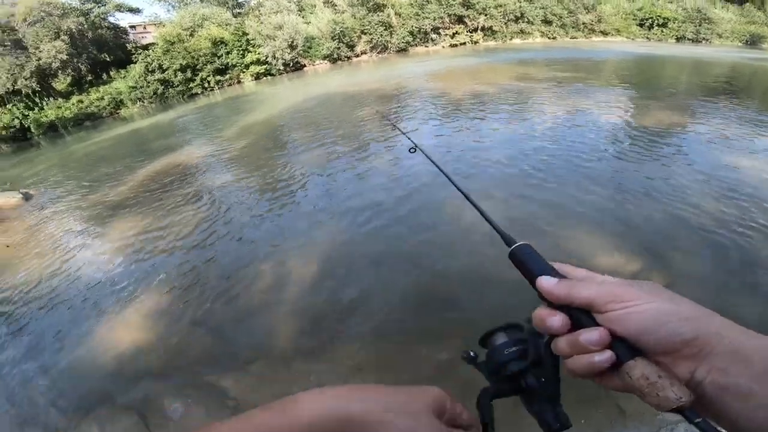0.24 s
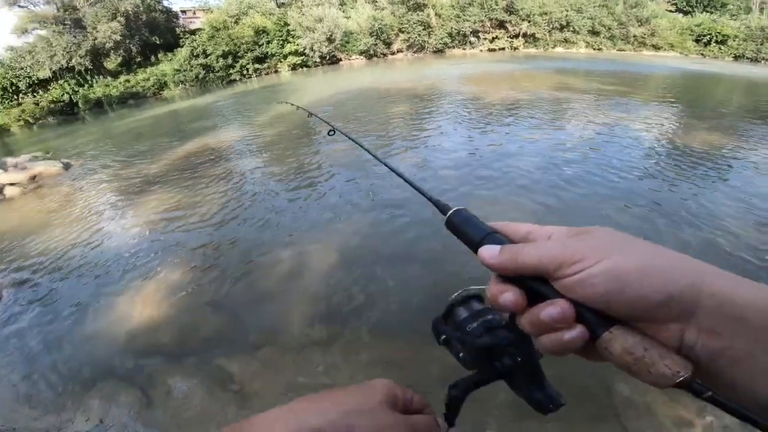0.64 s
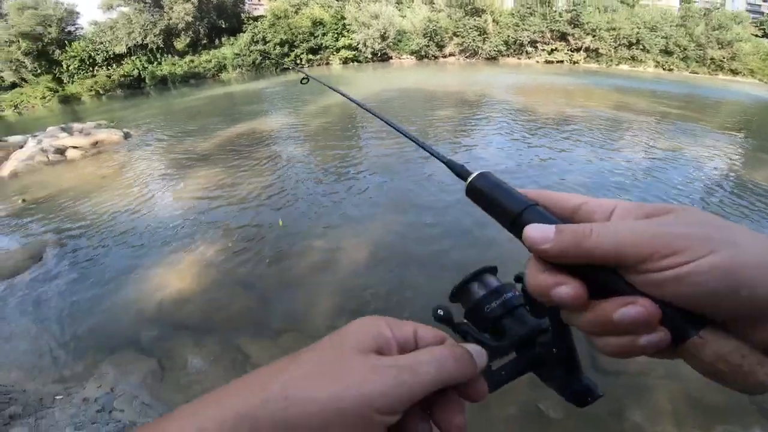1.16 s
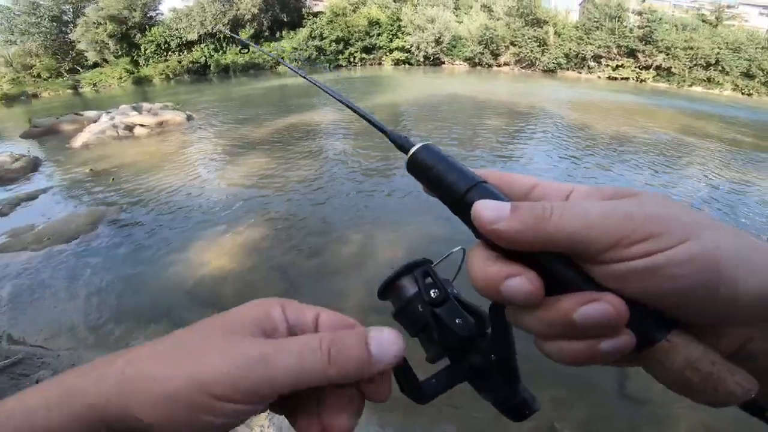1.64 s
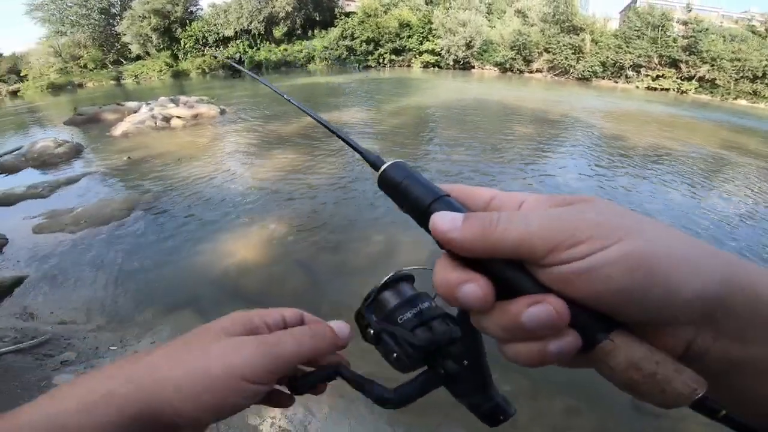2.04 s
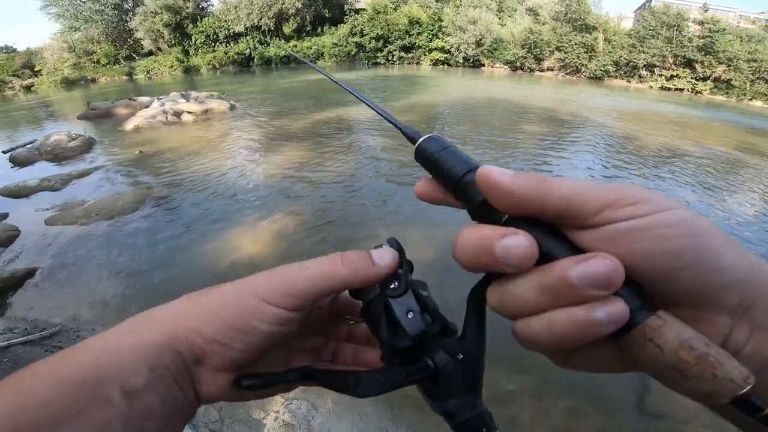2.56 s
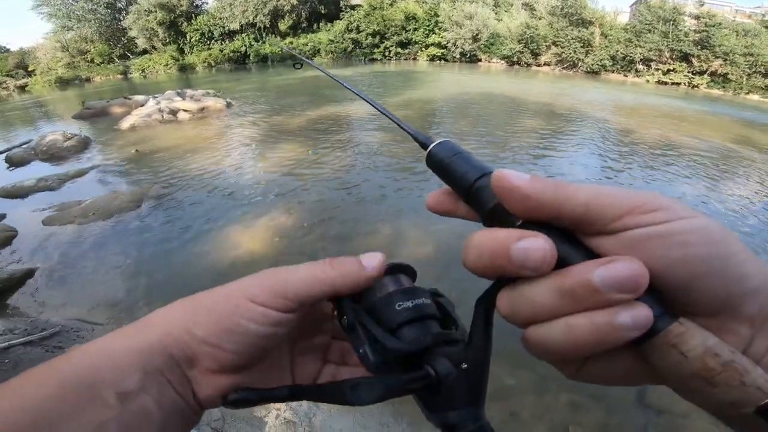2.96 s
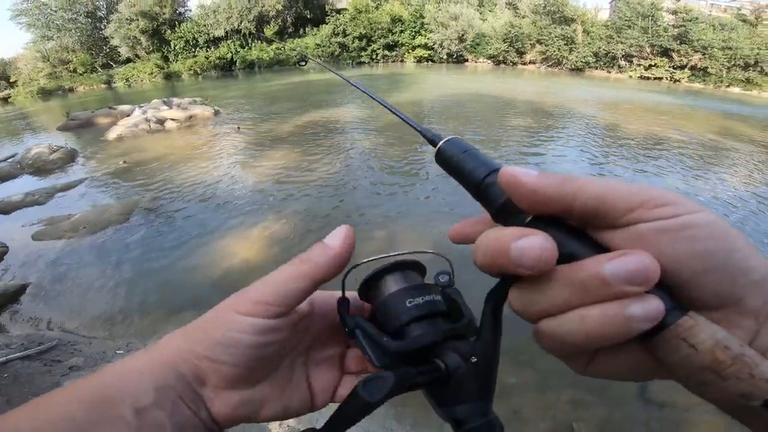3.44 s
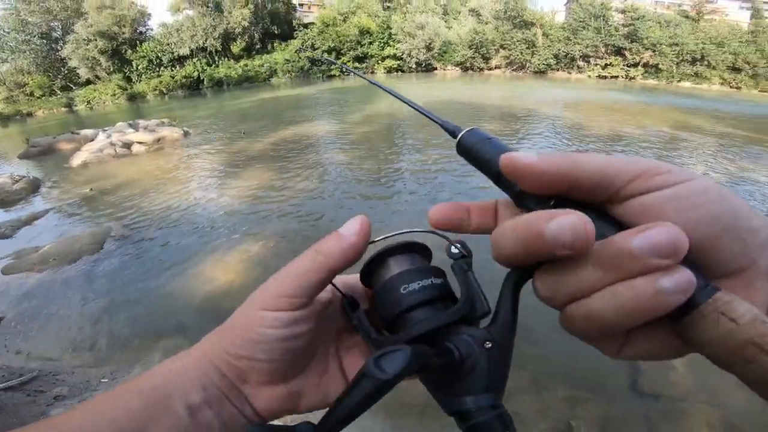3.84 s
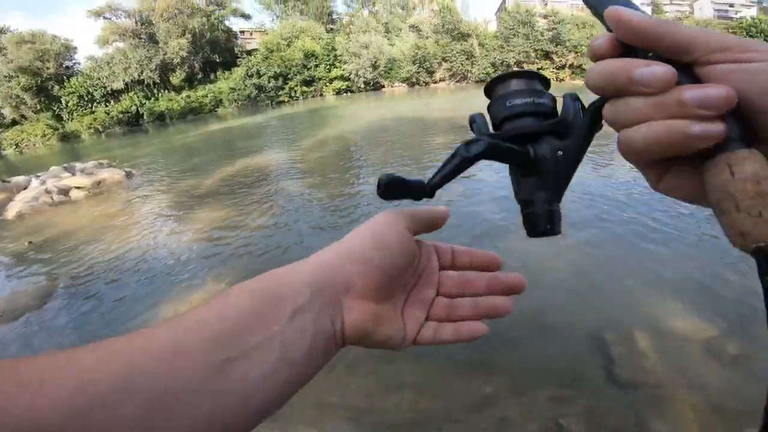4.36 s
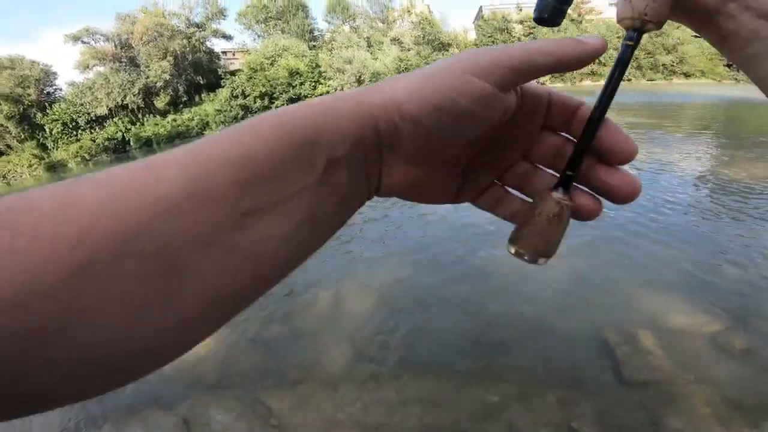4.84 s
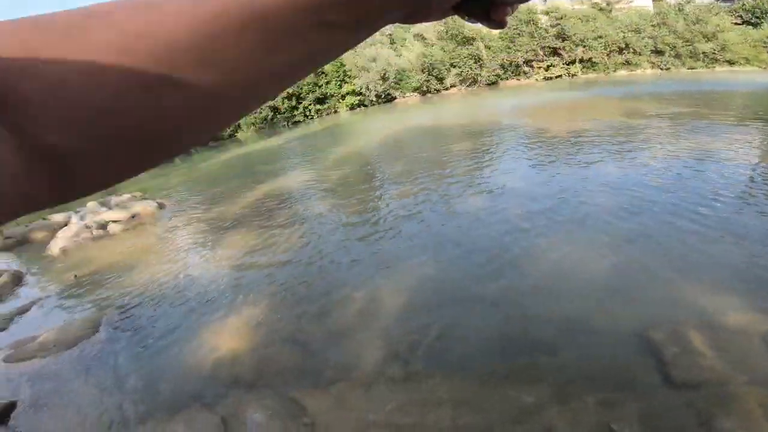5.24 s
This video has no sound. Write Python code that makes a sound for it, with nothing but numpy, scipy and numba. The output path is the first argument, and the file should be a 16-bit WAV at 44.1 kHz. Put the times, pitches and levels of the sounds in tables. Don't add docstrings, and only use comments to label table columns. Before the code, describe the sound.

Cicadas drone steadily from riverside trees, one nearer insect pulsing in quick buzzes, while a fishing reel ticks and snaps sharply up close.

```python
import sys
import numpy as np
from scipy import signal
from scipy.fft import rfft, irfft, next_fast_len
from scipy.io import wavfile
from scipy.ndimage import uniform_filter1d
from numba import njit

SR = 44100
rng = np.random.default_rng(int(sys.argv[2]) if len(sys.argv) > 2 else 0)


def boost(x):
    u = np.asarray(x, float) / 20
    return 10 ** u


def transcribe(u):
    v = np.clip(np.atleast_2d(u).T, -1, 1)
    q = np.round(v * 32767).astype(np.int16)
    wavfile.write(sys.argv[1], SR, q)


N = 242991
T = np.arange(N) / SR
F = np.fft.rfftfreq(next_fast_len(N, True), 1 / SR) + 1e-9


def unit(x):
    return x / np.sqrt(np.mean(x ** 2))


def shape(x, gain):
    size = next_fast_len(N, True)
    return irfft(rfft(x, size) * gain, size)[..., :N]


def walk(rate):
    k = int(SR / rate)
    steps = np.repeat(rng.standard_normal(N // k + 1), k)
    return 1.3 * uniform_filter1d(uniform_filter1d(steps, k), k)[:N]


def ports(a, b, table):
    hz, db, right_db, alike, lead = np.transpose(table)

    def on(values):
        return np.interp(np.log(F), np.log(hz), values)

    coherence = np.clip(on(alike), 0, 1)
    gain = boost(on(db))
    gain *= np.clip(F / hz[0], 0, 1) ** 6 * np.clip(hz[-1] * 1.078 / F, 0, 1) ** 30
    right_gain = gain * boost(on(right_db))
    delay = np.exp(-1j * on(np.unwrap(lead)))
    left = shape(a, gain)
    right = shape(a, right_gain * coherence * delay) + shape(b, right_gain * np.sqrt(1 - coherence ** 2))
    pair = np.array([left, right])
    return pair / np.sqrt(np.mean(pair.mean(0) ** 2))


def tymbal(rate_hz, jitter, spread, hiss):
    phase = np.cumsum(rate_hz * (1 + jitter * walk(40))) / SR + rng.random()
    return unit(rng.standard_normal(N) * (np.exp(-(phase % 1) / spread) + hiss))


def foliage(x, smear_ms, wet):
    keep = np.exp(-1000 / (smear_ms * SR))
    tail = np.sqrt(signal.lfilter([1 - keep], [1, -keep], x ** 2))
    return x + wet * tail * rng.standard_normal(N)


def ring(modes, db, start):
    t = T[:1800, None]
    hz, mode_db, t60 = np.transpose(modes)
    decay = np.exp(-np.log(1000) * t / t60)
    return np.sum(boost(mode_db + db) * np.sin(2 * np.pi * hz * t + start) * decay, 1)


def add(out, s, sound):
    i = int(s * SR)
    out[:, i:i + sound.shape[1]] += sound[:, :N - i]


# t/s, level/dB, change of left minus right/dB
CHORUS_LEVEL = [
    (0.0, -43.5, 0),
    (0.57, -44, 0.5),
    (1.12, -44.5, 1),
    (1.53, -44, 1.5),
    (2.25, -44, 2),
    (4.08, -44, 1.5),
    (4.3, -45.5, 1.5),
    (5.51, -44.5, 0.5),
]
# f/Hz, left level/dB, right minus left/dB, coherence [0-1], left lead/rad
CHORUS_FIELD = [(1934, -49.5, 4, 0.4, 2), (2315, -42.5, 0, 0.41, 0), (3070, -43, 0, 0.56, -0.5),
                (3720, -49, -0.5, 0.67, 0.32), (4314, -37.5, -0.5, 0.84, 0.6), (4800, -32, -1, 0.57, 1.26),
                (5674, -36.5, 1, .23, 1.9), (5930, -44, 2, 0.1, 2), (6750, -44, 3.5, 0.6, 1.5),
                (8019, -45.5, -0.5, 0.46, 2.5), (8830, -57.5, -1, 0.14, 4), (10000, -57.2, -8, 0.5, -2),
                (11400, -64.8, -2, 0.7, 5), (15000, -63.2, -10, 0.2, -2)]


def chorus():
    def crowd(count):
        total = 0
        for pace, start, pitch in rng.random((count, 3)):
            cycle = 2 * np.pi * ((5.5 + 1.804 * pace) * T + start)
            burst = np.clip(0.76 + np.sin(cycle), 0, 1)
            total = total + burst * tymbal(230 + 60 * pitch, 0.02, 0.63, 0.083)
        return unit(foliage(total, 46, 1.3))

    s, db, pan_db = np.transpose(CHORUS_LEVEL)
    db, pan_db = np.interp(T, s, db), np.interp(T, s, pan_db)
    field = ports(crowd(count=6), crowd(count=6), CHORUS_FIELD)
    return field * boost(db + 1.0 + np.array([pan_db, -pan_db]) / 2)


# f/Hz, left level/dB, right minus left/dB, coherence [0-1], left lead/rad
RIVER_FIELD = [(25, -18, -3.5, 0.73, -1.5), (51.7, -9.5, 0.5, 0.99, -0.26), (84.6, -19.5, 1, 0.94, -0.2),
               (171, -9.5, 1, 0.99, -0.3049), (300, -14, 1, 0.947, -0.24), (536, -16, 2.5, 0.97, -0.61),
               (800, -23, 7, 0.16, -0.05), (1004, -23, 2.5, 0.28, 1), (1240, -22.5, -1, 0.23, 3),
               (1520, -25, -0.5, 0.5, 1.72), (1783, -27, 0, 0.18, 0)]
# t/s, rumble rise level/dB, wash rise level/dB
AIR_PUFFS = [(.27, 7, 2.5), (.43, 5, 1.5), (.72, 8.5, 3.5), (1.0, 5, 3), (1.3, 5, 1), (1.5, 6, 2),
             (2.05, 10, -4.5), (2.35, 8.5, -3.5), (2.93, 14, -2.5), (3.2, 3, 2), (3.47, 8, 2.5),
             (3.85, 3, -1.5), (4.35, 4.5, -2), (4.9, 3.5, 1.5), (5.22, 6, 1.5), (5.5, 4, 5)]
RIVER_DB, PUFF_S = -46.5, 0.0994
CALM_RUMBLE_DB, CALM_WASH_DB = -4.5, -1.5
WATER_DB, WATER_FADE_DB_S = 0.9, -0.38


def river():
    wash = ports(rng.standard_normal(N), rng.standard_normal(N), RIVER_FIELD) * boost(RIVER_DB)
    s, rumble_db, wash_db = np.transpose(AIR_PUFFS)
    puffs = np.exp(-((T[:, None] - s) / PUFF_S) ** 2)
    rumble = shape(wash, 1 / (1 + (F / 130) ** 4))
    low = shape(wash, 1 / (1 + (F / 450) ** 4))
    out = rumble * boost(CALM_RUMBLE_DB + puffs @ rumble_db)
    out += (low - rumble) * boost(CALM_WASH_DB + puffs @ wash_db)
    out += (wash - low) * boost(WATER_DB + WATER_FADE_DB_S * T)
    return out


# f/Hz, level/dB
MACHINES = [(49.3, -63.5), (299.5, -57.5)]


def hum():
    return sum(boost(db + 4.0 * walk(6)) * np.sin(2 * np.pi * (hz * T + 0.333 * walk(3))) for hz, db in MACHINES)


# f/Hz, level/dB, t60/s, right lead/rad
CASE_MODES = [(1300, 0, 0.034, 2.87), (1334, 0, 0.029, 2.62), (1565, -1.5, 0.019, 2),
              (1884, -7, 0.026, 0.51)]
# t/s, level/dB
CASE_KNOCKS = [(.74, -44), (1.261, -38), (1.7586, -12), (4.81, -22.5), (4.95, -46), (5.066, -40),
               (5.198, -41), (5.308, -36), (5.361, -38), (5.392, -37), (5.465, -35), (5.483, -25),
               (5.490, -28), (5.497, -21.5), (5.5060, -12)]


def case():
    out = np.zeros((2, N))
    modes, lead = np.array(CASE_MODES)[:, :3], np.array(CASE_MODES)[:, 3]
    push = np.hanning(30)
    push /= push.sum()
    small = signal.butter(3, 950, "high", fs=SR, output="sos")
    swing = signal.sosfilt(small, [np.convolve(ring(modes, 0, start), push) for start in (-lead, 0)])
    swing *= 1 - np.exp(-T[:swing.shape[1]] / 0.0015)
    for s, db in CASE_KNOCKS:
        add(out, s, boost(db) * swing)
    strap = rng.standard_normal(N)
    rub = unit(np.array([signal.fftconvolve(strap, side)[:N] for side in swing]))
    return out + rub * boost(-73 + 2.5 * walk(8.6))


# first burst t/s, period/s
BURST_PACE = [
    (.054, .146),
    (1.66, .158),
    (2.134, .1468),
    (2.868, .1562),
    (3.649, .1519),
    (4.712, .162),
    (5.195, .17),
]
# t/s, drum level at left port/dB,
# head turn [-1 away, 0 left port faces him, 1 he is ahead]
SINGER_PATH = [(0, -39.5, -1), (.5, -42, -0.94), (.65, -43.5, -0.7), (1.07, -43, -0.43),
               (1.3, -42.5, -0.35), (1.95, -40, 0), (2.5, -44, .1), (3.0, -41, 0.027), (3.5, -43, .1),
               (3.65, -41, .2), (4.1, -42.5, -0.53), (4.27, -44.5, 0.58), (4.7, -47.5, 0.93),
               (4.88, -42, 0.78), (5.2, -49, 0.97), (5.4, -48.5, 1.23)]
# f/Hz, width/Hz, left lead/rad
BELLY, DRUM, RIB, EDGE = (2460, 950, -.6), (4910, 580, 1.45), (7140, 790, 2.34), (10050, 1300, -1.6)
# level when faced/dB, slope/dB per turn, bend/dB per turn squared
HEAD_SHADOW = [
    ((-12.5, -0.5, -2.5), (-37, .5, 3.5)),
    ((0, 2.5, -0.5), (-11, 3.5, 8)),
    ((-9.5, 2.5, -2), (-11, 7, 4)),
    ((-18.5, 3, -6), (-45, -0.5, -4.5)),
]


def singer():
    ends = [first - period / 2 for first, period in BURST_PACE[1:]] + [T[-1]]
    s = np.concatenate([np.arange(first, end, period) for (first, period), end in zip(BURST_PACE, ends)])
    nearest = np.searchsorted((s[1:] + s[:-1]) / 2, T)
    burst = np.clip(1.343 * (1 - np.abs(T - s[nearest]) / 0.047), 0, 1)
    at, db, turn = np.transpose(SINGER_PATH)
    turn = np.interp(T, at, turn)
    level = boost(np.interp(T, at, db) + 1.5)
    clicks = foliage(tymbal(258, 0.03, 0.18, 0.077) * burst * level, 8.3, 0.66)

    def shade(faced_db, slope_db, bend_db):
        return boost(faced_db + slope_db * turn + bend_db * turn ** 2)

    out = np.zeros((2, N))
    for (hz, width, lead), (left, right) in zip((BELLY, DRUM, RIB, EDGE), HEAD_SHADOW):
        peak = (1 / (1 + 1j * (F / hz - hz / F) * hz / width)) ** 2
        peak /= np.sqrt(np.mean(np.abs(peak) ** 2))
        out[0] += shade(*left) * shape(clicks, peak)
        out[1] += shade(*right) * shape(clicks, peak * np.exp(-1j * lead))
    return out


# f/Hz, level/dB, t60/s
REEL_MODES = [(1100, -13, 0.0086), (1760, -16.5, 0.03), (2183, -7, 0.013), (2970, -4.5, 0.0066),
              (3470, -1, 0.0051), (4000, -0.5, 0.0063), (4830, -1.5, 0.0064), (5700, -2.5, 0.0049),
              (6400, 0, 0.004), (7025, 1.5, 0.0058), (7500, -5.5, 0.0042), (9060, -10.5, 0.0044),
              (11370, -14, 0.0067), (11200, -7, 0.0026), (13850, -28, 0.0019), (16500, 2, 0.0037)]
# t/s, level/dB, rattle/ms, weight (level of low modes)/dB, left minus right/dB
REEL_TICKS = [(1.7555, -27, 2, -10, 0), (2.1811, -30.5, 1.6, 4, -5), (2.1835, -33.5, 1.4, 14, 7),
              (2.2228, -32, 3.2, 3, -3), (2.8809, -35, 1.2, 10, 7), (2.9437, -21, 3.6, -1, -4),
              (2.9475, -30, 2.5, 17, 7), (3.0386, -32, 2.2, 2, 5), (3.3807, -37, 2.42, 6, 0),
              (3.6499, -13, 1.3, -8, -1.5), (3.6516, -26, 1.4, -14, -3), (3.7534, -39, 1.5, -14, -2),
              (3.8995, -33.5, 1.5, -12, -2), (4.068, -20.5, 1.23, -20, -3), (4.138, -3, 1.2, -10, 2),
              (4.1389, -13.5, 4.3, -9.5, -5), (4.144, -23.5, 3.9, 9, 10), (4.1877, -23.5, 1.8, 3, -7),
              (4.1902, -20.5, 3.3, 9, 2), (4.1943, -28.5, 3.5, 8, -2), (5.4800, -36.5, 13, -1, -3),
              (5.49, -30, 4.3, 1, 8), (5.4955, -34, 5, 2, -3.5), (5.5058, -23, 1.8, -6, -6)]
TREBLE_DB, TREBLE_PER_WEIGHT = -1.5, -0.25
CRACK_DB = 1.5


def reel():
    out, modes = np.zeros((2, N)), np.array(REEL_MODES)
    hz = modes[:, 0]
    cycle = np.sin(2 * np.pi * np.arange(7).clip(0, 4) / 4)
    cracks = [boost(CRACK_DB) * np.pad(cycle, (late, 1793 - late)) for late in (0, 2)]
    small = signal.butter(3, 1000, "high", fs=SR, output="sos")
    chances = rng.standard_normal((len(REEL_TICKS), 512))
    for (s, db, ms, low_db, pan_db), chance in zip(REEL_TICKS, chances):
        hits = chance[:max(int(ms * SR / 1000), 2)]
        hits = hits * np.abs(hits) ** 0.5 * np.exp(-1.1 * np.linspace(0, 1, len(hits)))
        high_db = TREBLE_DB + TREBLE_PER_WEIGHT * low_db
        grip = modes * (1 + 0.0075 * chance[-40:-40 + len(hz), None] * [1, 0, 0])
        tilt_db = low_db * np.clip((4500 - hz) / 2200, 0, 1) + high_db * np.clip((hz - 5500) / 3500, 0, 1)
        left_start = np.pi * np.arange(len(hz))
        right_start = left_start - 0.97 * hz / 7000 + 1.15 * chance[-len(hz):]
        pair = []
        for start, crack in zip((left_start, right_start), cracks):
            pair.append(np.convolve(hits, ring(grip, tilt_db, start) + boost(high_db) * crack))
        pair = signal.sosfilt(small, pair)
        add(out, s, pair / np.max(np.abs(pair)) * boost(db + 4 + np.array([[pan_db], [-pan_db]]) / 2))
    return out


def scene():
    return chorus() + singer() + river() + hum() + reel() + case()


# f/Hz, level/dB
MEMBRANE_LOSS = [(10400, 0), (11300, -14), (12200, -11.5), (13000, -16), (13800, -7), (15000, -24.5),
                 (16500, -37)]


def membrane(dry):
    hz, db = np.transpose(MEMBRANE_LOSS)
    return shape(dry, boost(np.interp(np.log(F), np.log(hz), db)))


@njit
def follow(x, fall):
    e, out = 0., np.empty(len(x))
    for i in range(len(x)):
        e = max(x[i], e * fall)
        out[i] = e
    return out


def gain_control(dry):
    peak = follow(np.max(np.abs(dry), 0), np.exp(-1 / (0.037 * SR)))
    duck = np.minimum(1, boost(-10.5) / (peak + 1e-9))
    late = np.concatenate([np.ones(500), duck])[:N]
    return uniform_filter1d(late, size=150)


def roll_off(x):
    return signal.sosfilt(signal.butter(12, 16500, fs=SR, output="sos"), x)


def record(dry):
    mix = membrane(dry) * gain_control(dry)
    return roll_off(mix)


dry = scene()
out = record(dry)
transcribe(out)
```